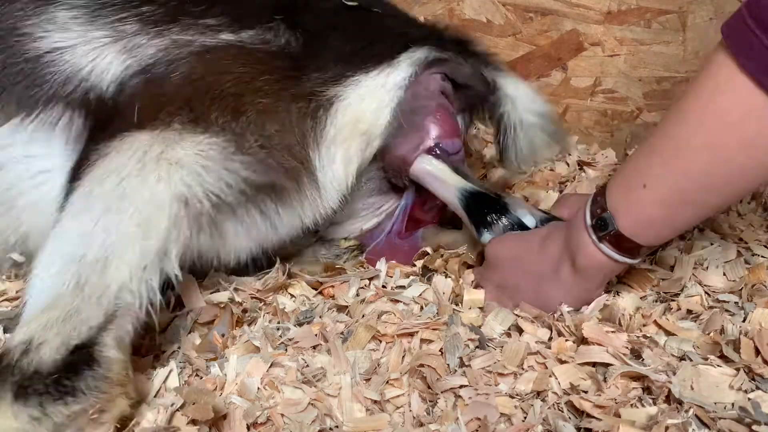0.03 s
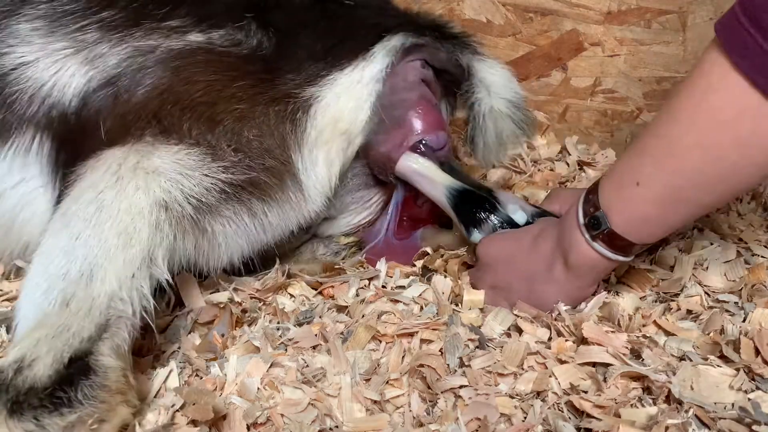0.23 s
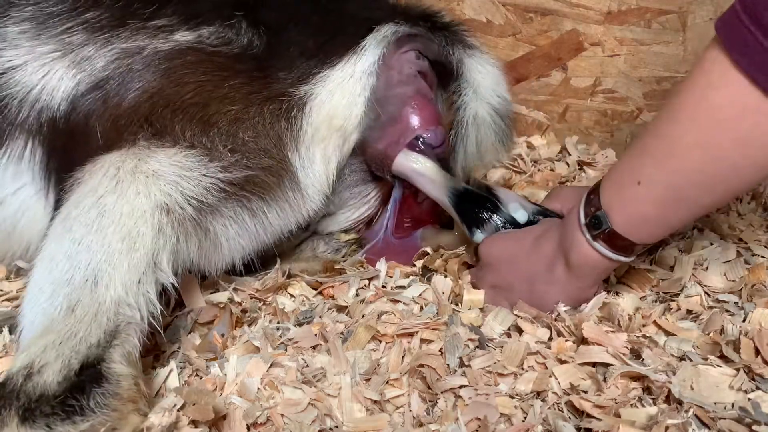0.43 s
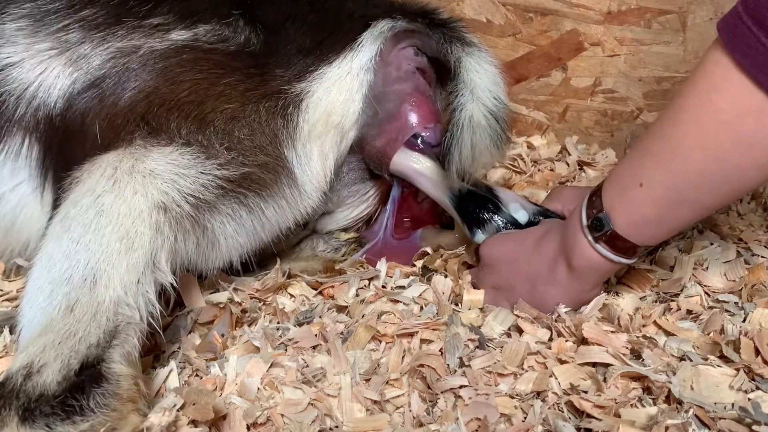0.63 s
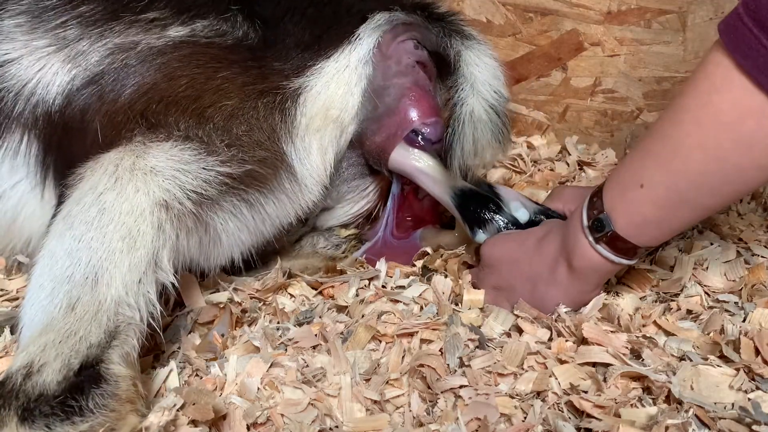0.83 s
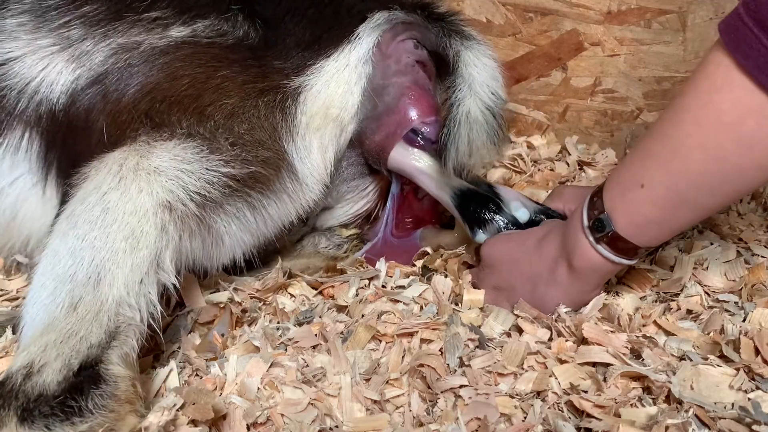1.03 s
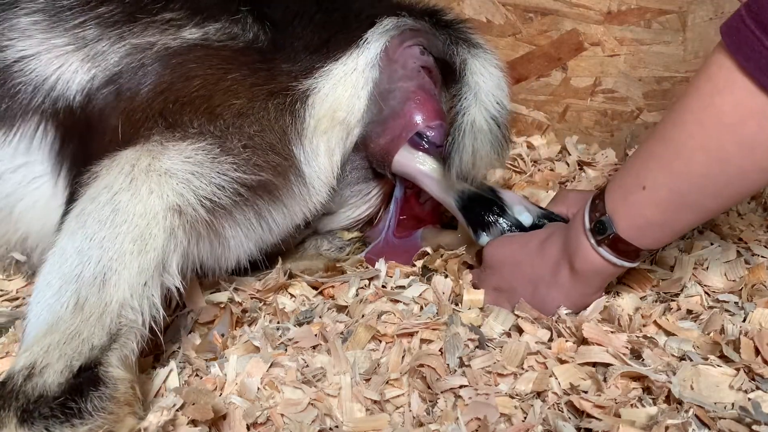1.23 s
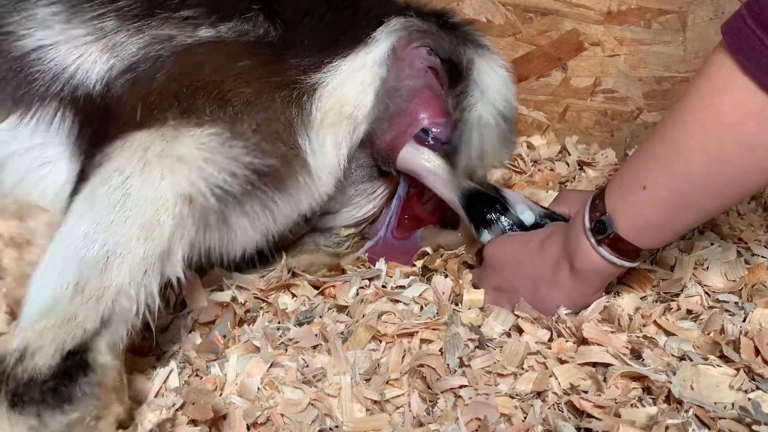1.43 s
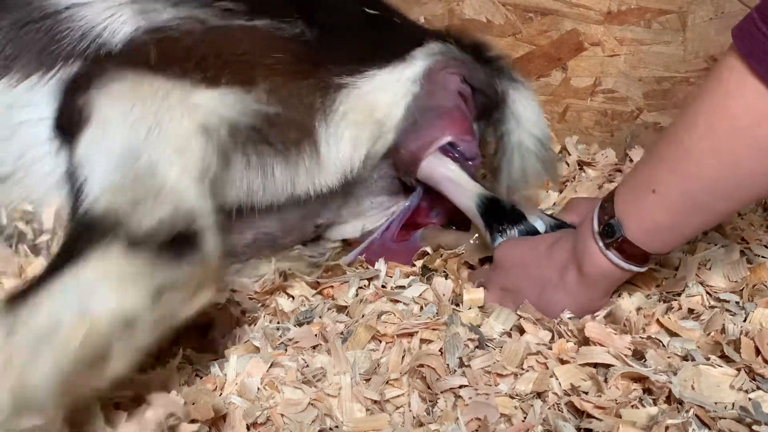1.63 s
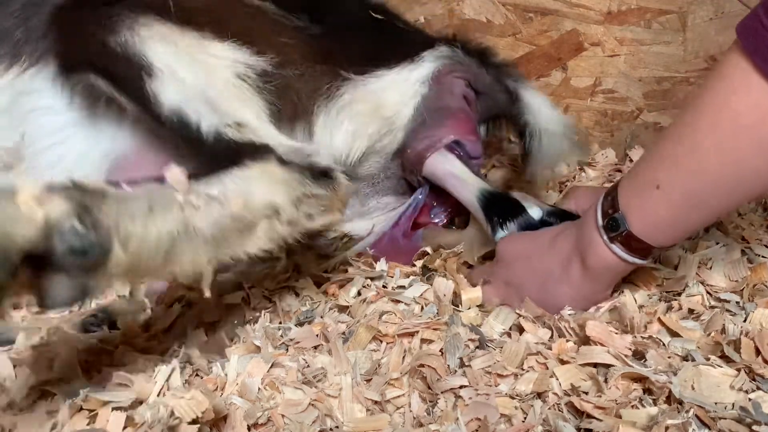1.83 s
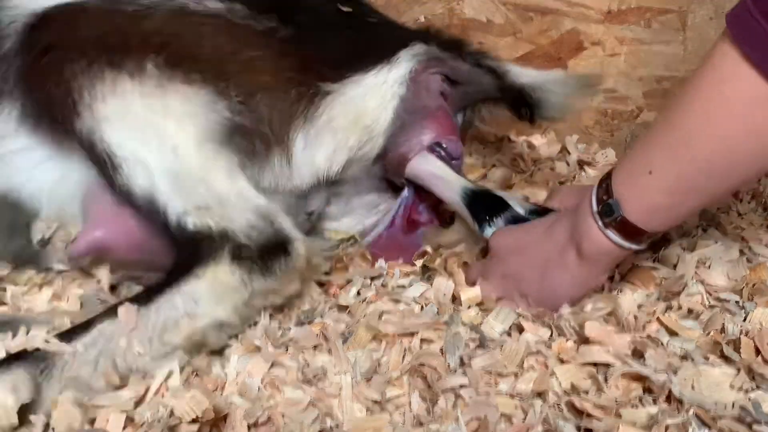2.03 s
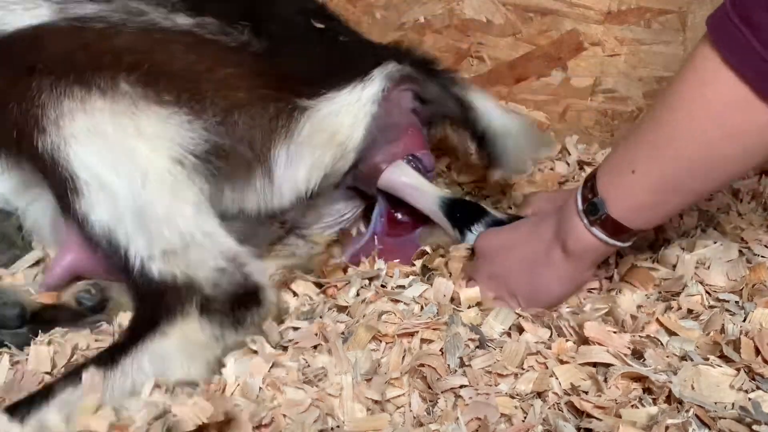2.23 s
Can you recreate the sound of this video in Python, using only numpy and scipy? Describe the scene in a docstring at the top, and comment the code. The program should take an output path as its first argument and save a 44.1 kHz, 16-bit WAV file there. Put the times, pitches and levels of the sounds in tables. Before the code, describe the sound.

A goat gives a run of short, hoarse bleats that quicken and grow louder through the first second. They merge into a rough scream, which trails off in a thin, sinking whimper around 1.4 seconds. At 1.8 seconds she grunts quietly, then her leg rustles through wood shavings, softly bumping the floor at about 2 and 2.3 seconds. A faint low hum fills the small wooden stall.

```python
"""A goat in labour lies in wood shavings in a small wooden stall; a low hum runs throughout.
First her vocal folds chop her breath into hoarse bleats, which quicken and ring in her throat.
After a second they merge into a rough scream that trails off in a thin, sinking whimper.
Then she grunts and kicks a hind leg through the crackling shavings, bumping the floor twice."""
import sys
import numpy as np
from scipy import signal
from scipy.fft import rfft, irfft
from scipy.io import wavfile
from scipy.ndimage import map_coordinates

SR = 44100
rng = np.random.default_rng(int(sys.argv[2]) if len(sys.argv) > 2 else 0)


def file_out(sig):
    """Save sig as 16-bit WAV at sys.argv[1]."""
    # one column per channel
    cols = np.atleast_2d(sig).T
    # limit, then scale
    lim = np.clip(cols, -1, 1)
    pcm = np.round(lim * 32767).astype(np.int16)
    wavfile.write(sys.argv[1], SR, pcm)


N = 105840
TIME = np.arange(N) / SR
JITTER_HZ = 169.5  # how fast the pitch of the voice trembles


def goat():
    """All her cries and the brief ringing tones heard with them, before the echo is added."""
    # bursts of voice: t/s, length/s, level/dB, swell/dB, pitch/Hz, roughness/0-1, mouth opening/0-1,
    # rasp f/Hz, rasp level/dB, treble tilt/(dB per kHz), overtone level/dB
    bleats = [(0.06,0.047,-27.5,12.5,135.3,0.16,0.06,4040,-19,0.07,-10),
              (0.195,0.058,-17.5,11.5,155.5,0.25,0.14,3530,-5,-0.26,-9.5),
              (0.381,0.062,-17.5,5.5,160,0.31,0.31,3600,-3.5,-0.5,-7.5),
              (0.498,0.048,-15,4,197.3,0.4,0.6,3655,3.5,-0.5,-15),
              (0.602,0.05,-15,3,212.5,0.29,.9,3500,-0.5,0,-6),
              (0.718,.048,-14.5,2,206.8,0.4,1,2640,-6,-0.04,-13.5),
              (0.814,.048,-14.5,3.5,223.9,0.22,1,3570,3,-0.28,-6),
              (0.911,0.057,-17,2.5,220.2,0.32,1,2690,-6.5,-0.1,-6),
              (1.018,0.063,-23.5,6.5,192.6,0.17,0.95,2760,5,.5,-32),
              (1.515,0.073,-37,-3.5,204,0.24,0.88,2600,-24,-9.5,-5)]
    # ringing tones during and just after the cries: t/s, length/s, start f/Hz, end f/Hz, level/dB
    tones = [(.404, 0.028, 1574, 1662, -19), (0.535, 0.045, 861.6, 853, -20),
             (0.635, 0.029, 922, 850, -21.5), (1.328, 0.041, 858, 922, -30.5),
             (1.205, 0.095, 818, 846, -31.5), (1.545, 0.06, 865, 840, -36)]
    voice = np.zeros(N)
    for start, *row in bleats:
        add(voice, start, bleat(*row))
    add(voice, *scream())
    add(voice, *whimper())
    for start, *row in tones:
        add(voice, start, ringing_tone(*row))
    add(voice, 1.779, grunt())
    return voice


def bleat(length, level_db, swell_db, pitch_hz, rough, mouth, rasp_hz, rasp_db, tilt_db, overtone_db):
    """One burst that grows rougher; pitch and mouth rise and ease back, then the throat cuts it off."""
    # where the throat rings, with the mouth half shut or open:
    # half-shut f/Hz, open f/Hz, width/Hz, half-shut level/dB, open level/dB
    resonances = [(176, 192.4, 78, -13.5, -24), (284, 502, 131, -10, -6), (712, 927, 210, -3.5, -9),
                  (1000, 1350, 164, -14.5, -14), (1547, 1764, 113, -8.5, -4.5),
                  (2270, 2320, 120, -48, -9.5), (2470, 2584, 305, -12, -1.5), (3627, 3394, 347, -6.5, -2.5),
                  (4460, 3955, 590, -3, -6.5), (5010, 5280, 610, -6, -13), (6800, 6850, 250, -35, -26),
                  (9760, 9800, 3900, -19, -32.5)]
    attack_s, release_s, swell_s = 0.0022, 0.0064, 0.037
    t = np.arange(0, length + 0.064, 1 / SR)
    progress = np.minimum(t / length, 1)
    sag = 1 - np.sin(np.pi * progress / 1.35)  # zero about two thirds of the way through
    drive, cycles = vocal_folds(t, pitch_hz * (1 - 0.2 * abs(mouth) * sag), rough * (1 + progress))
    opening = mouth * (1 - 0.36 * sag)
    voice = amp(rasp_db - 15.5 * progress ** 2) * unit(resonate(drive, rasp_hz, width_hz=217))
    for shut_hz, open_hz, width_hz, shut_db, open_db in resonances:
        hz = shut_hz + opening * (open_hz - shut_hz)
        db = shut_db + opening * (open_db - shut_db) + tilt_db * hz / 1000
        voice += amp(db) * unit(resonate(drive, hz, width_hz))
    fade = np.minimum(t / attack_s, 1) * np.exp(-np.maximum(t - length, 0) / release_s)
    gain = amp(level_db - swell_db * np.maximum(1 - t / swell_s, 0))
    return (unit(voice) + amp(overtone_db) * overtone(cycles)) * fade * gain


def scream(overtone_db=-11):
    """A held, rough cry through a quivering throat; gives its start time and its sound."""
    # course of the cry: t/s, level/dB, pitch/Hz, roughness/0-1
    course = [(1.008, -23, 186, 0.27), (1.03, -19.5, 188, 0.28), (1.092, -21, 188, 0.33),
              (1.108, -27, 188, 0.4), (1.127, -19, 191, .4), (1.188, -21, 208, 0.49), (1.222, -19, 213, .4),
              (1.29, -21, 208.1, .35), (1.348, -20.5, 201.2, .35), (1.375, -66, 190, 0.53)]
    # where the throat rings: f/Hz, width/Hz, level/dB
    resonances = [(586, 136, -1.5), (872, 130, -0.5), (1444, 134, -9), (1910, 370, -4), (2730, 510, -4.5),
                  (3710, 450, -1), (4420, 230, -8.5), (5350, 750, -8), (7320, 170, -24.5),
                  (10100, 2600, -32)]
    start, t, level_db, hz, rough = follow(course)
    drive, cycles = vocal_folds(t, hz, rough)
    voice = throat(drive, resonances, stretch=1 + 0.013 * wander(t, rate_hz=25))
    return start, amp(level_db) * (voice + amp(overtone_db) * overtone(cycles))


def whimper(waver=0.0029):
    """The scream breaks into a thin, clear voice that sinks; gives its start time and its sound."""
    # course of the whimper: t/s, level/dB, pitch/Hz
    course = [(1.35, -34, 312), (1.4, -35.5, 304), (1.45, -48, 277), (1.5, -39.5, 252), (1.56, -47, 212)]
    # where the nearly closed throat rings: f/Hz, width/Hz, level/dB
    resonances = [(296.1, 114, -21), (930, 122, -11), (1890, 920, 7.5), (3800, 250, 6), (5100, 1560, 5)]
    start, t, level_db, hz = follow(course)
    cycles = np.cumsum(hz * (1 + waver * wander(t, JITTER_HZ))) / SR
    buzz = sum(np.cos(2 * np.pi * k * cycles) for k in range(1, 28))
    return start, amp(level_db) * throat(buzz, resonances) * signal.windows.tukey(len(t), 0.1)


def grunt(length=0.116, attack_s=0.023):
    """A short, low grunt; its pitch and the ring of the mouth both fall as the mouth closes."""
    t = np.arange(0, length, 1 / SR)
    progress = t / length
    pitch_hz = np.interp(progress, [0, 1], [166.1, 126])
    mouth_hz = np.interp(progress, [0, 1], [558, 210])
    drive, _ = vocal_folds(t, pitch_hz, rough=0.19)
    low_note = unit(resonate(drive, pitch_hz, width_hz=69))
    mouth = unit(resonate(drive, mouth_hz, width_hz=246)) * amp(-5 - 16 * progress)
    return (low_note + mouth) * amp(-34.5 - 14 * progress ** 2) * np.minimum(t / attack_s, 1)


def vocal_folds(t, hz, rough, jitter=0.09, shimmer_db=4, puff_above_hz=400):
    """Uneven pulses, each with a puff of rushing air when rough; also gives the count of cycles."""
    rough = np.clip(rough, 0, 1)
    cycles = np.cumsum(hz * (1 + jitter * rough * wander(t, JITTER_HZ))) / SR
    pulses = np.diff(np.floor(cycles), prepend=-1)
    airflow = 0.22 + np.exp(-(cycles % 1) / 0.052)  # steady breath plus a puff in each cycle
    puffs = airflow * rng.standard_normal(N)[:len(t)]
    puffs = signal.sosfilt(signal.butter(2, puff_above_hz, "high", fs=SR, output="sos"), puffs)
    strength = amp(shimmer_db * rng.uniform(-1.2, 1, 256))[cycles.astype(int)]
    return (np.sqrt(1 - rough) * unit(pulses) + np.sqrt(rough) * unit(puffs)) * strength, cycles


def throat(drive, resonances, stretch=1):
    """The throat rings at several frequencies at once; stretch shifts them all."""
    return unit(sum(amp(db) * unit(resonate(drive, hz * stretch, width_hz))
                    for hz, width_hz, db in resonances))


def overtone(cycles):
    """A clean tone at twice the pitch, which gives the cry its body."""
    return unit(np.sin(4 * np.pi * cycles))


def ringing_tone(length, start_hz, end_hz, level_db, waver_hz=145.8, fade_s=0.0057):
    """A brief, wavering ringing tone heard during or just after a cry."""
    t = np.arange(0, length, 1 / SR)
    glide_hz = start_hz + (end_hz - start_hz) * t / length
    hz = glide_hz * (1 + 0.012 * wander(t, waver_hz))
    tone = unit(np.sin(2 * np.pi * np.cumsum(hz) / SR))
    fade = np.minimum(np.minimum(t, length - t) / fade_s, 1)
    return amp(level_db + wander(t, waver_hz)) * fade * tone


def clicks(decay_s=0.001):
    """Brief, bright ticks during the bleats and the scream."""
    # single ticks: t/s, level/dB
    ticks = [(0.2,-40), (0.242,-44), (0.382,-28), (0.44,-28.5), (0.539,-18.5), (0.605,-47), (0.763,-29.5),
             (0.815,-26.5), (1.277,-29), (1.342,-28)]
    # their bright tone: f/Hz, level/dB
    tick_tone = [(300,-23), (5000,12), (16000,-12)]
    t, out = TIME[:1024], np.zeros(N)
    for start, db in ticks:
        add(out, start, amp(db) * rng.standard_normal(len(t)) * np.exp(-t / decay_s))
    return colour(out, tick_tone)


def shavings(snaps_per_s=6700):
    """Her leg slides through the bedding: thousands of tiny snaps over a dull scuffing."""
    # loudness of the slide: t/s, crackle level/dB, scuff level/dB
    slide = [(0, -89, -51.5), (1.45, -51, -53), (1.62, -61, -53), (1.75, -59.5, -76), (1.79, -48, -35.5),
             (1.841, -70, -49.5), (1.949, -57, -64), (1.965, -43.5, -59), (2.05, -45, -57),
             (2.11, -51, -54.5), (2.179, -43, -43), (2.28, -44, -42), (2.34, -50, -49.5), (2.4, -51.5, -45)]
    # tone of the snapping shavings: f/Hz, level/dB
    snap_tone = [(150, -24), (400, -1), (1100, -5), (2300, -6), (3800, -1.5), (7300, -8.5), (10400, -7),
                 (16000, -18)]
    # tone of the scuffing: f/Hz, level/dB
    scuff_tone = [(30, -18), (70, -3.5), (130, -11.5), (260, -13.5), (500, -23), (1200, -33), (4000, -53)]
    times, crackle_db, scuff_db = np.transpose(slide)
    snaps = spikes(N, snaps_per_s) * amp(-np.minimum(rng.exponential(1, (2, N)), 4))
    crackle = spread(colour(snaps, snap_tone), side=1.09)
    crackle *= amp(np.interp(TIME, times, crackle_db) + 0.5 * wander(TIME, rate_hz=70))
    scuff = spread(colour(rng.standard_normal((2, N)), scuff_tone), side=0.41)
    return crackle + scuff * amp(np.interp(TIME, times, scuff_db))


def floor_bumps():
    """Her leg sets the floor booming for a few cycles."""
    # knocks on the floor: t/s, length/s, f/Hz, level/dB
    knocks = [(1.986, 0.078, 67.5, -38), (2.295, 0.042, 68.5, -47.5)]
    out = np.zeros(N)
    for start, length, hz, db in knocks:
        t = np.arange(0, length, 1 / SR)
        boom = np.sin(2 * np.pi * hz * t) * signal.windows.tukey(len(t), 0.5)
        add(out, start, amp(db) * unit(boom))
    return out * amp([[1.2], [-3]])  # louder on the left


def stall_echo(early_s=0.018, ring_fade_s=0.21, shared=0.21):
    """The stall's answer to one click: first echoes off the boards, then a short, ringing tail."""
    # how long the tail takes to fade by 60 dB: f/Hz, t/s
    fade_times = [(100, 0.34), (400, 0.25), (900, 0.29), (3000, 0.32), (6000, 0.27), (14000, 0.44)]
    # narrow bands in which the stall rings on: f/Hz, level/dB
    rings = [(855, -29), (1740, -29), (3830, -23), (5500, -22)]
    t = TIME[:SR // 2]
    late = spikes(len(t), per_s=3000) * (t > 0.006)
    hz, times, spectrum = signal.stft(late, SR, nperseg=256)
    spectrum *= amp(-60 * times / read(fade_times, hz)[:, None])
    tail = signal.istft(spectrum, SR, nperseg=256)[1][:, :len(t)]
    early = spikes(len(t), per_s=900) * (t > 0.0015) * np.exp(-t / early_s)
    parts = [(-7.5, tail), (-3, early)]  # level/dB, sound
    for ring_hz, db in rings:
        ring = np.array([resonate(side, ring_hz, width_hz=197) for side in late])
        parts.append((db, ring * amp(-60 * t / ring_fade_s)))
    echo = sum(amp(db) * part / np.linalg.norm(part, axis=1, keepdims=True) for db, part in parts)
    echo[1] = shared * echo[0] + np.sqrt(1 - shared ** 2) * echo[1]  # the sides are partly alike
    return echo


def stall(voice):
    """The voice and its echo come from the left, so they reach the right side a little later."""
    # tone of the echo, weak in the bass: f/Hz, level/dB
    echo_tone = [(200,-7), (800,2.5)]
    # how far the right side lags the left: f/Hz, delay/s
    right_lag = [(150, 0.00014), (350, 0.00017), (700, 0.0008), (1000, 0.00077), (1700, 0.00037),
                 (6000, 0.000409)]
    # tone of the right side against the left: f/Hz, level/dB
    right_tone = [(100, 3.5), (400, -5.5), (900, -2.5), (1200, 1), (2500, -4), (4000, 1), (6000, 1.5),
                  (14000, -1.5)]
    echo = stall_echo()
    reflected = colour(signal.fftconvolve(voice[None], echo, axes=1), echo_tone)
    left, right = (voice + reflected) / np.sqrt(1 + np.sum(echo[0] ** 2))
    hz = np.fft.rfftfreq(N, 1 / SR)
    right = irfft(rfft(right) * np.exp(-2j * np.pi * hz * read(right_lag, hz)), N)
    return np.array([left, colour(right, right_tone)])


def background():
    """A low rumble with a wavering hum."""
    # notes of the hum: f/Hz, level/dB
    notes = [(78, -55), (156, -59.5)]
    # tone of the rumble: f/Hz, level/dB
    rumble_tone = [(20, -31), (50, -5.5), (80, -2.5), (115, -5.5), (170, -16), (300, -23), (1000, -24.5),
                   (4000, -34), (16000, -62)]
    hum = np.zeros(N)
    for hz, db in notes:
        gain = amp(db + 2.8 * wander(TIME, rate_hz=3.1))
        hum += gain * unit(np.sin(2 * np.pi * hz * TIME + 0.65 * wander(TIME, rate_hz=5.3)))
    rumble = amp(-53) * spread(colour(rng.standard_normal((2, N)), rumble_tone), side=0.8)
    return (hum + rumble) * amp([[1.5], [-2.5]])  # louder on the left


def amp(db):
    """Turns decibels into a number to multiply by."""
    return 10 ** (np.asarray(db) / 20)


def unit(x):
    """Scales a sound to an average power of 1."""
    return x / np.sqrt(np.mean(x ** 2) + 1e-20)


def read(points, hz):
    """Looks up values between the rows of a table, with frequency spaced like musical pitch."""
    f, value = np.transpose(points)
    return np.interp(np.log(hz + 1), np.log(f + 1), value)


def follow(course):
    """Gives a table's start time, the time since then and each further column as a curve."""
    times, *columns = np.transpose(course)
    t = np.arange(0, times[-1] - times[0], 1 / SR)
    return times[0], t, *(np.interp(t + times[0], times, column) for column in columns)


def add(mix, start_s, sound):
    """Mixes a sound in at its start time."""
    part = mix[max(round(start_s * SR), 0):][:len(sound)]
    part += sound[:len(part)]


def colour(x, points):
    """Shapes the tone of a sound by a table of f/Hz, level/dB."""
    size = 2 * N
    gain = amp(read(points, np.fft.rfftfreq(size, 1 / SR)))
    return irfft(rfft(x, size) * gain, size)[..., :N]


def wander(t, rate_hz):
    """A smooth random wobble with a size of about 1."""
    return map_coordinates(rng.standard_normal(2048), [t * rate_hz], order=3, mode="wrap")


def spikes(samples, per_s):
    """Two channels of spikes with random times and sizes."""
    return rng.standard_normal((2, samples)) * (rng.random((2, samples)) < per_s / SR)


def resonate(x, hz, width_hz):
    """Keeps a narrow band of a sound around hz, which may glide."""
    spin = np.exp(2j * np.pi * np.cumsum(hz * np.ones(len(x))) / SR)
    decay = np.exp(-2 * np.pi * width_hz / SR)
    low = x / spin + 1e-18  # slide the band down to 0 Hz, smooth it, then slide it back
    for _ in range(3):
        low = signal.lfilter([1 - decay], [1, -decay], low)
    return 2 * (spin * low).real


def spread(x, side):
    """Turns two unrelated sounds into left and right; more side makes it wider."""
    return unit(np.array([x[0] + side * x[1], x[0] - side * x[1]]))


def scene():
    """The goat in her stall, her leg in the bedding and the background."""
    return amp(0.5) * stall(goat() + clicks()) + shavings() + floor_bumps() + background()


def record(dry, ceiling=0.88, cutoff_hz=16200):
    """The microphone colours the sound; then peaks are capped and the highest treble is cut."""
    # microphone tone, with two dips in the treble: f/Hz, level/dB
    microphone = [(30, 1.5), (5600, -0.5), (6400, 3), (7400, 5.5), (8500, -7), (9700, 5.5), (12300, 6.5),
                  (13600, -34), (15000, 19), (16000, -51)]
    capped = np.clip(colour(dry, microphone), -ceiling, ceiling)
    treble_cut = signal.firwin(511, cutoff_hz, window=("kaiser", 9), fs=SR)
    return signal.oaconvolve(capped, treble_cut[None], "same")


dry = scene()
out = record(dry)
file_out(out)
```